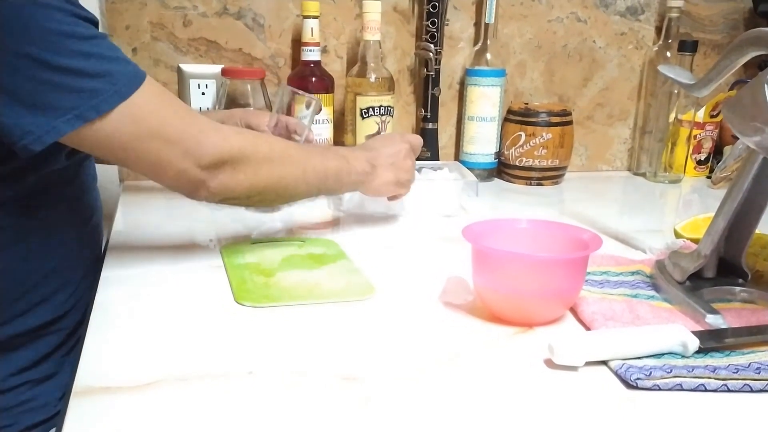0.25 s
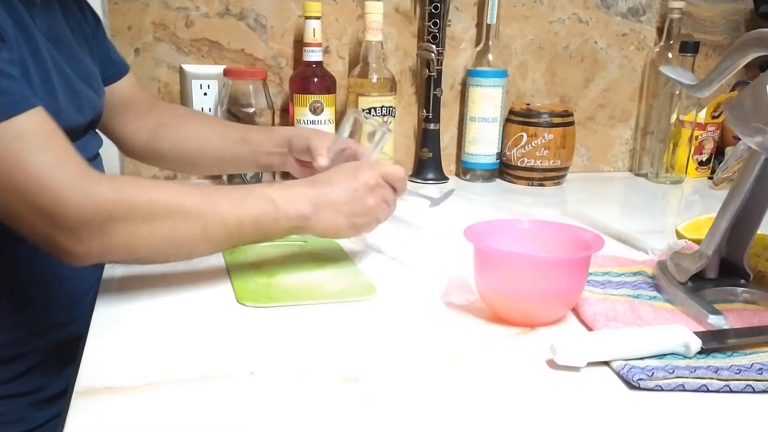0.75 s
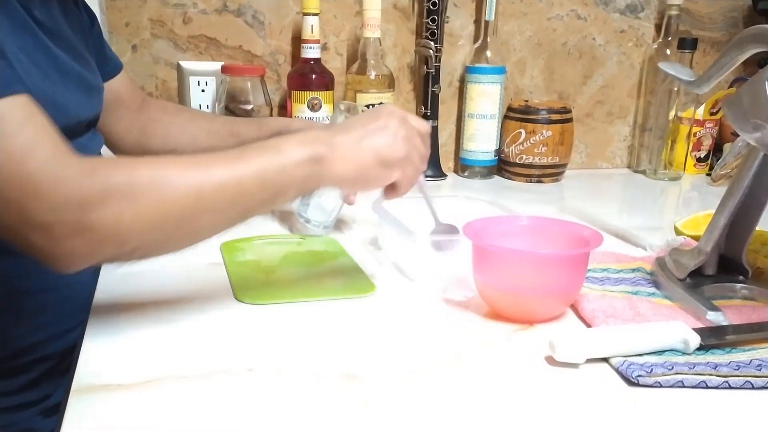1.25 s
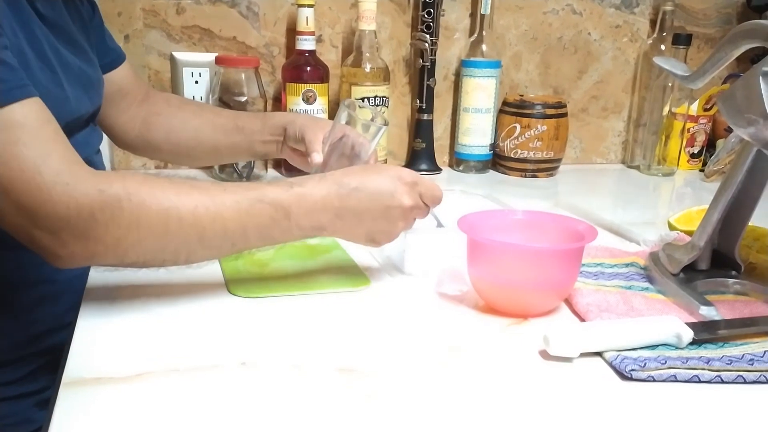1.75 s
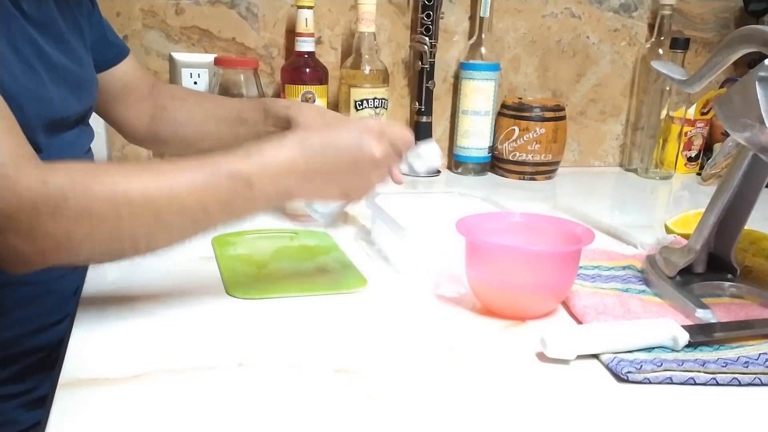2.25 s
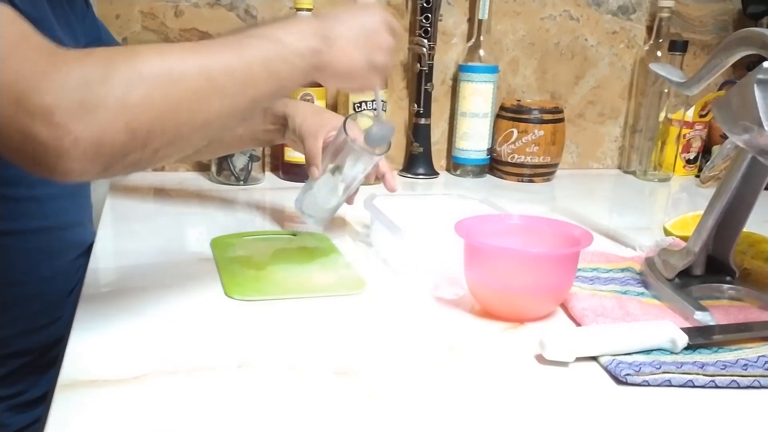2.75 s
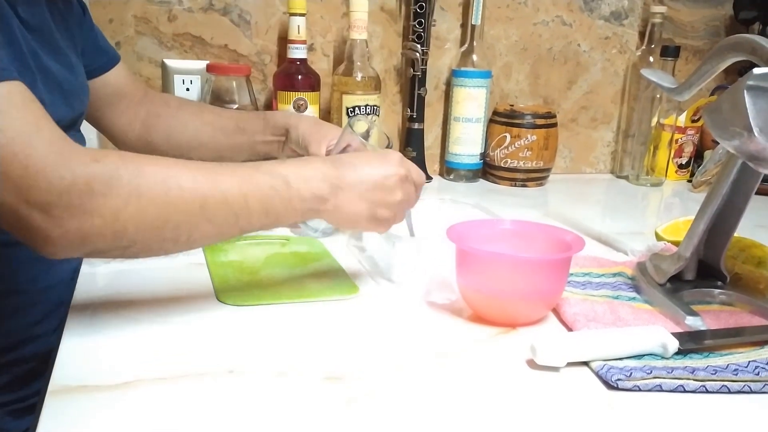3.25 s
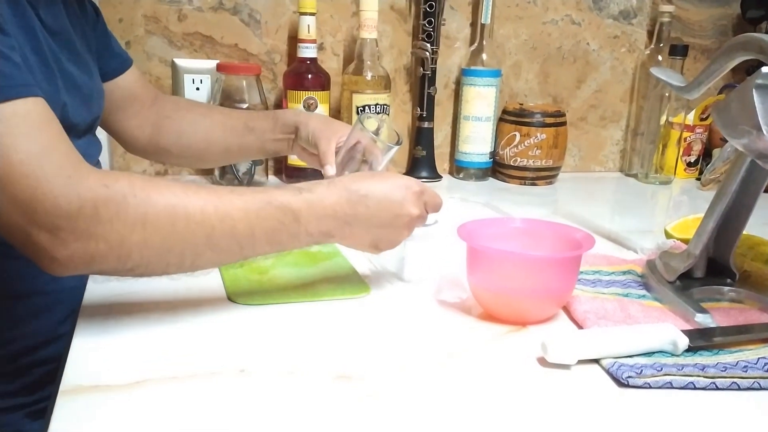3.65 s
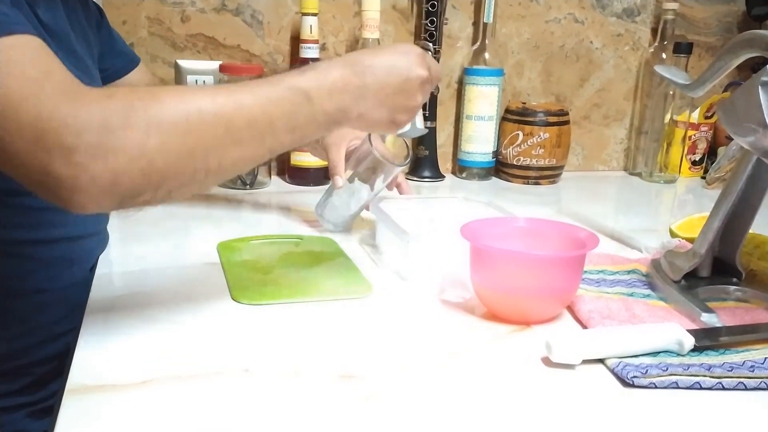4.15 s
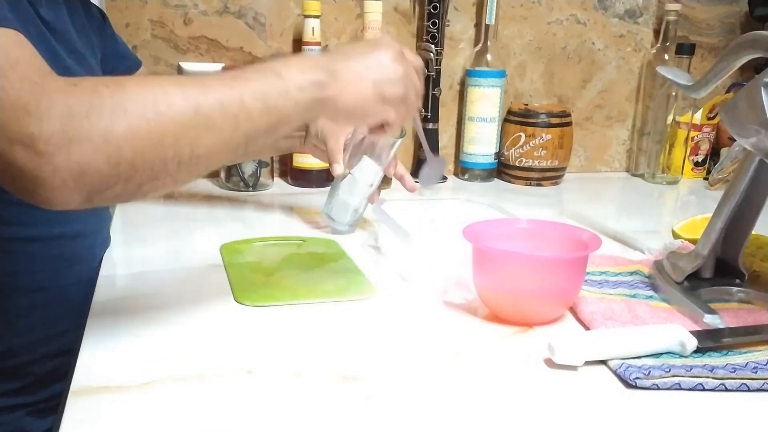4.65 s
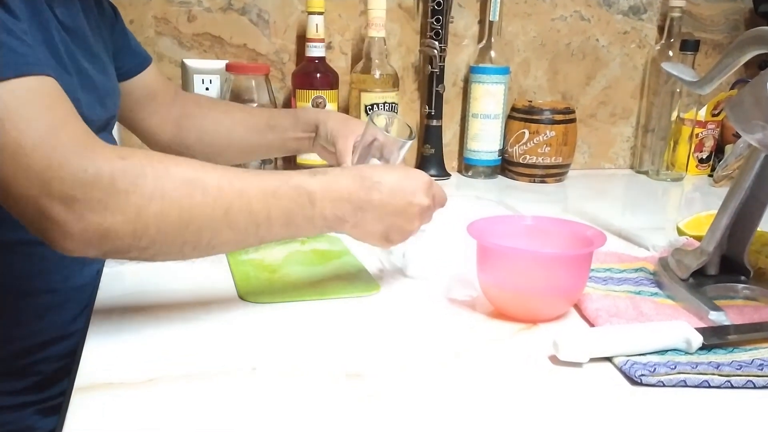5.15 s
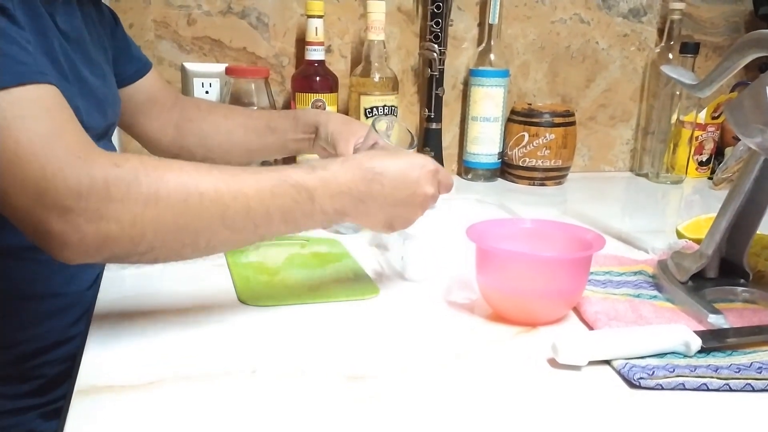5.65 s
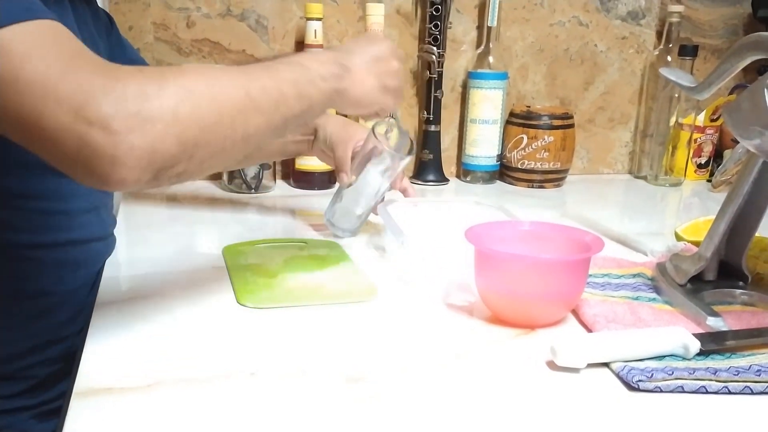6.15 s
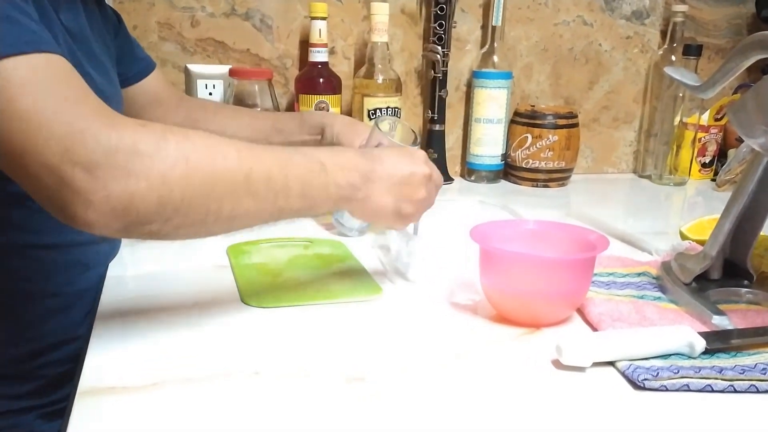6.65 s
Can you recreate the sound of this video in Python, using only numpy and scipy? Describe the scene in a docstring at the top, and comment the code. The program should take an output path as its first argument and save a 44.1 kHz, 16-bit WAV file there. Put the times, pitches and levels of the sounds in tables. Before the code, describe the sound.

A metal spoon digs through ice cubes in a plastic tub, gritty and crunching, then cubes clink brightly into a tall glass, three times over.

```python
"""A low hush of the house runs throughout. Ice grinds and knocks in a plastic tub as a metal spoon digs into it:
bursts of noisy slips and gritty collisions, answered by the resonances of the tub, which also shifts softly.
Then the cubes clink down a tall glass, cracking and waking decaying modes of its wall and the air inside.
Digging and clinking alternate, three spoonfuls in all, with thin pings of the spoon; the digging goes on at the end.
A hard-walled kitchen rings around it in stereo echo patterns, and a near stereo microphone rounds off peaks."""
import sys
import numpy as np
from scipy import signal
from scipy.fft import rfft, irfft
from scipy.io import wavfile
from scipy.ndimage import uniform_filter1d

SR = 44100
rng = np.random.default_rng(int(sys.argv[2]) if len(sys.argv) > 2 else 0)


def transcribe(signal):
    """Save signal, clipped to [-1, 1], as a 16-bit WAV file at the path in sys.argv[1]."""
    frames = np.atleast_2d(signal).T
    limited = np.clip(frames, -1, 1)
    pcm = np.round(limited * 32767).astype(np.int16)
    wavfile.write(sys.argv[1], SR, pcm)


N = 304290


def from_db(db):
    """Decibels to gain."""
    return 10 ** (np.asarray(db) / 20)


def unit_energy(x):
    """Scale so that the squares of each channel sum to one."""
    return x / np.sqrt(np.sum(x ** 2, axis=-1, keepdims=True) + 1e-20)


def at_hz(points, hz):
    """Read a table on a log-frequency axis."""
    freqs, values = np.transpose(points)
    return np.interp(np.log(np.maximum(hz, 1)), np.log(freqs), values)


def seconds(length):
    """A time axis."""
    return np.arange(int(length * SR)) / SR


def add(track, s, sound):
    """Mix a sound into a track at time s."""
    start = max(int(s * SR), 0)
    part = sound[:max(N - start, 0)]
    track[start:start + len(part)] += part


def colour(x, spectrum, size=4096):
    """Causal (minimum-phase) filter with the given spectrum."""
    bins_hz = np.arange(size // 2 + 1) * SR / size
    cepstrum = irfft(np.log(from_db(at_hz(spectrum, bins_hz))))
    # fold the cepstrum forward in time: this makes the phase minimal
    cepstrum[1:size // 2] *= 2
    cepstrum[size // 2 + 1:] = 0
    response = irfft(np.exp(rfft(cepstrum)))
    return signal.oaconvolve(x, response)[:len(x)]


def resonate(x, hz, width_hz):
    """A resonance with gain one at its top."""
    r = np.exp(-np.pi * width_hz / SR)
    zeros = np.array([1, 0, -1]) * (1 - r * r) / 2
    poles = [1, -2 * r * np.cos(2 * np.pi * hz / SR), r * r]
    return signal.lfilter(zeros, poles, x + 1e-18)


def resonate_twice(x, hz, width_hz):
    """A resonance with steep skirts that swells before it dies."""
    return resonate(resonate(x, hz, width_hz), hz, width_hz)


def chatter(t60, rise_s, grit_db):
    """One collision of rough faces: a dying volley of tiny uneven contacts."""
    t = np.arange(4096) / SR
    signs, sizes = rng.standard_normal((2, len(t)))
    swell = 1 - np.exp(-t / max(rise_s, 1e-5))
    return unit_energy(signs * swell * from_db(grit_db * sizes - 60 * t / t60))


def crumble():
    """A knock among loose cubes: the collision itself, then its neighbours settling."""
    collision = chatter(t60=0.028, rise_s=0.0012, grit_db=2.0)
    settling = chatter(t60=.13, rise_s=0.0055, grit_db=3.5)
    return collision + from_db(-6.0) * settling


def struck(modes, strength_db):
    """Ring of one blow; where it lands and what presses on the body shift each mode's share and pitch a little."""
    hz, level_db, t60 = np.transpose(modes)
    t = seconds(.6)
    share, load = rng.standard_normal((2, len(hz)))
    hz = hz * (1 + .002 * load)
    gains = from_db(level_db + strength_db + 2 * share) * rng.choice([-1, 1], len(hz))
    decays = np.exp(-np.log(1000) * t / t60[:, None])
    return gains @ (decays * np.sin(2 * np.pi * hz[:, None] * t))


def favour(modes, hz, db_per_octave):
    """A contact feeds the modes near its own pitch best: dB for each mode, flat beyond half an octave."""
    octaves_off = np.abs(np.log2(np.array(modes)[:, 0] / hz))
    return -db_per_octave * np.minimum(octaves_off, .5)


def grinding(per_s, spread_db, slip_t60, evenness_s):
    """Cubes slip past each other in random jerks, each a short rasp; rms about one."""
    sizes_db = spread_db * np.minimum(rng.exponential(1, N), 4)
    jerks = (rng.random(N) < per_s / SR) * from_db(sizes_db)
    power = signal.lfilter([1], [1, -from_db(-120 / (slip_t60 * SR))], jerks ** 2 + 1e-9)
    local_mean = uniform_filter1d(power, int(evenness_s * SR)) + 1e-9
    return rng.standard_normal(N) * np.sqrt(power / local_mean)


def force(strokes, attack_s, release_s, sag_db_per_s=0):
    """Gain over time for each level column: every stroke rises, sags while it lasts and lets go."""
    gains = np.zeros((len(strokes[0]) - 2, N))
    for start, length, *levels_db in strokes:
        t = seconds(length + release_s)
        rise = np.minimum(t / attack_s, 1)
        release = np.clip(1 - (t - length) / release_s, 0, 1)
        shape = rise * release * from_db(-sag_db_per_s * t)
        for gain, level_db in zip(gains, levels_db):
            add(gain, start, from_db(level_db) * shape)
    return gains


def hush(side_db):
    """Steady low background of the house: coloured noise, its side part weaker than its middle."""
    # Colour of the quiet room. Each row: frequency in Hz, relative level in dB.
    hush_colour = [(15, -43.5), (25, -10.5), (115, -7.5), (186, -16.5), (224, -6.5), (250, -24),
                   (344, -12.5), (383, -19), (588, -27.5), (15000, -40)]
    level_db = -55.5  # rms of the middle part
    mid, side = (np.sqrt(N) * unit_energy(colour(rng.standard_normal(N), hush_colour)) for _ in range(2))
    return from_db(level_db) * (mid + from_db(side_db) * side * [[1], [-1]])


def tub(crunch_db, rasp_db, grind_wall_db, knock_crunch_db, knock_db, knock_wall_db, split_hz):
    """Cubes crunch low and rasp high as they grind and knock; the plastic walls answer."""
    # Pushes of the spoon through the cubes, before the trims passed in.
    # Each row: start in seconds, length in seconds, crunch level in dB, rasp level in dB.
    pushes = [(0.28, 0.16, -33, -25.5), (0.43, 0.049, -18, -26.5), (0.51, 0.14, -37, -28.5),
              (0.68, 0.088, -23, -23.5), (0.755, .16, -19.5, -14.5), (1.255, 0.3, -21, -18.5),
              (1.435, 0.18, -16, -11), (1.65, 0.18, -26, -27.5), (1.855, 0.039, -27, -15.5),
              (3.24, 0.21, -14, -7), (3.44, 0.21, -24.5, -19), (3.69, 0.23, -38.5, -28.5),
              (4.06, 0.081, -29, -21), (4.96, 0.098, -12.5, -10.5), (5.07, 0.2, -22.5, -24),
              (5.295, 0.2, -23.5, -26), (5.53, .11, -37, -42), (5.722, 0.082, -16.5, -28.5),
              (6.615, 0.14, -18, -25), (6.745, 0.11, -17.5, -19.5)]
    # Cubes and spoon knocking, before the trims passed in. Each row: time in seconds, level in dB,
    # then crunch and tub wall, both in dB relative to that level.
    knocks = [(0.2712, -29.5, -0.5, -28), (0.2899, -15.5, 0.5, -16), (0.4728, -21.5, -1.5, -7),
              (0.651, -19, 3, -9.5), (0.773, -20.5, 9.5, -21), (0.8614, -11, 0.5, -31),
              (0.8893, -10, -3, -13), (1.1186, -16.5, -10.5, -12), (1.1875, 4, -9, -17),
              (1.2836, -12.5, 3, -5.5), (1.3541, -16.5, 1.5, 1), (1.4228, -7, -11, -8),
              (1.4569, -3, -7, -8), (1.5198, -18.5, -14, 2.5), (1.6222, -11, -1.5, -18),
              (1.8567, -20, -5, -8.5), (1.8885, -8, -7, -13.5), (3.1634, -6.5, -9.5, -10),
              (3.2655, -6, -4, -7), (3.2944, 2, -24, -9.5), (3.4222, -8.5, -18, -9),
              (3.6155, -10.5, -3, -6.5), (3.6549, -14, -7, -12), (3.6847, -7, -3, -25),
              (3.7728, -15.5, -32, -19), (3.8595, -6.5, -7, -10), (4.0516, -20, -24, -16),
              (4.0721, -15.5, -6, -14), (4.1496, -25, 6.5, -14), (4.8855, -13, -8, -11),
              (4.9082, -6.5, 0, -13), (5.0364, -23, -3, 6.5), (5.0515, -20, 3.5, -2.5),
              (5.3002, -14, -10, -15), (5.5196, -24.5, 1.5, -3.5), (5.8479, -10, -5, -14),
              (6.0813, -16.5, 0, -10), (6.5913, -7.5, -0.5, -10), (6.6029, -12, -7, -20),
              (6.858, -13.5, -12, -27)]
    # Resonances of the tub. Each row: frequency in Hz, width of each of two passes in Hz, level in dB.
    tub_modes = [(352.5, 190, -25), (677, 148, -7.5), (899.8, 162, -2), (934.4, 140, 4), (1041, 112, -3.5),
                 (1549, 110, -6)]
    # Colour of ice on ice. Each row: frequency in Hz, relative level in dB.
    ice_colour = [(40, -32.5), (150, -20), (400, -13), (700, -1.5), (1200, 0), (1800, 3.5), (2300, 0),
                  (3000, -3.5), (5200, -2), (7500, -6), (10500, -8.5), (13000, -14.5), (16000, -17.5)]

    # every push takes hold, sags as the cubes give way, and lets go
    crunch_push, rasp_push = force(pushes, attack_s=0.022, release_s=0.024, sag_db_per_s=39)
    # coarse slips crunch, fine ones rasp
    crunch = crunch_push * grinding(per_s=150, spread_db=5, slip_t60=.008, evenness_s=.04)
    rasp = rasp_push * grinding(per_s=300, spread_db=1.5, slip_t60=0.01, evenness_s=.03)
    wall = from_db(grind_wall_db) * crunch
    crunch = from_db(crunch_db) * crunch
    rasp = from_db(rasp_db) * rasp
    for s, level_db, body_db, wall_db in knocks:
        add(rasp, s, from_db(level_db + knock_db) * crumble())
        add(crunch, s, from_db(level_db + body_db + knock_crunch_db) * crumble())
        add(wall, s, from_db([level_db + wall_db + knock_wall_db]))  # one clean push

    low, high = (signal.butter(2, split_hz, kind, fs=SR, output="sos") for kind in ("low", "high"))
    out = colour(signal.sosfilt(low, crunch) - signal.sosfilt(high, rasp), ice_colour)
    for k, (hz, width_hz, level_db) in enumerate(tub_modes):
        out += (-1) ** k * from_db(level_db) * resonate_twice(wall, hz, width_hz)
    return out


def shifting(width_hz):
    """The tub judders softly on the counter: narrow bands of noise that swell and fade."""
    # Each row: start in seconds, end in seconds, pitch in Hz, level in dB at the top of the swell.
    shifts = [(0.832, 1.10, 151, -45.5), (0.997, 1.30, 129, -53), (1.992, 2.366, 385, -51.5)]
    out, t = np.zeros(N), np.arange(N) / SR
    for start, end, hz, level_db in shifts:
        judder = np.sqrt(N) * unit_energy(resonate_twice(rng.standard_normal(N), hz, width_hz))
        swell = np.sin(np.pi * np.clip((t - start) / (end - start), 0, 1))
        out += from_db(level_db) * judder * swell
    return out


def glass(crack_db, cube_db, cube_width_hz, air_db, slide_db):
    """Each contact cracks, rings the cube briefly, and wakes the glass wall and the air inside it."""
    # Cubes sliding down inside the glass, one row per spoonful, before slide_db.
    # Each row: start in seconds, length in seconds, level in dB.
    slides = [(2.755, 0.15, -42.5), (4.415, .115, -35.5), (6.19, 0.193, -32.5)]
    # Ice and spoon striking the glass, before the trims. Each row: time in seconds, level in dB,
    # weight behind the blow in dB, pitch of the contact in Hz, pitch of the air column in Hz.
    clinks = [(2.606, -39, 15, 7550, 650), (2.659, -24, -12.5, 7500, 570), (2.6992, -21, -3, 7800, 592),
              (2.7433, -20.5, -10, 6270, 718), (2.7685, -17.5, -2.5, 3200, 676),
              (2.7912, -11, 4.5, 5550, 645), (2.8374, -15.5, -1, 5800, 684), (2.8487, -17, -2, 6000, 622),
              (2.889, -9.5, 4, 5860, 677), (4.3464, -22.5, 3.5, 7750, 637), (4.386, -28.5, -18, 3200, 640),
              (4.4504, -10, 0.5, 5900, 661), (4.4609, -12.5, 1, 6150, 670), (4.4788, -17.5, -1, 5900, 637),
              (4.505, -15, -6, 5800, 706), (4.5255, -22, 2, 3180, 677), (6.1444, -29, 16.5, 3880, 643),
              (6.1744, -11, -10, 6100, 705), (6.2382, -20, -3, 6150, 635), (6.2514, -23, 11, 6200, 663),
              (6.3283, -7, 6, 5470, 735), (6.4765, -36.5, 30.5, 5440, 640)]
    # Modes of the glass wall, ringing free. Each row: frequency in Hz, level in dB, t60 in seconds.
    wall_modes = np.array([(1440, -2, 0.17), (1523, -7, 0.2), (3130, -2, 0.26), (3166, -6.5, 0.43),
                           (3720, -17, 0.22), (4540, -12, .25), (5400, -21, .25), (5351, -31, .25),
                           (5940, -2, 0.13), (5990, -2, 0.19), (5900, -26, 0.21), (7720, -2.5, 0.18),
                           (8770, -7.5, 0.45), (8920, -8.5, 0.29), (11040, -2.5, 0.15), (11630, -2.5, 0.11),
                           (13770, -4, 0.083), (15150, -8, 0.086)])
    # By the last spoonful the fuller glass rings softer and shorter, and ice meeting ice sounds brighter.
    # Each row: time in seconds, ring level in dB, treble level in dB, share of the free ring time (a ratio).
    fill_s, *filling = np.transpose([(2.7, -7.5, -0.5, .95), (4.4, -8, -0.5, 0.98), (6.3, -12, 7, 0.66)])
    # Colour of ice on glass. Each row: frequency in Hz, relative level in dB.
    crack_colour = [(40, -38), (200, -29), (600, -6), (1500, 1), (2400, -4.5), (3500, -1), (5000, 0.5),
                    (6200, 0.5), (7300, -2.5), (10500, -6), (13000, -14), (16000, -16)]

    sliding = force(slides, attack_s=0.037, release_s=0.011)[0]
    slips = grinding(per_s=150, spread_db=7, slip_t60=.006, evenness_s=.035)
    cracks = from_db(slide_db) * sliding * slips
    rings = np.zeros(N)
    for s, level_db, weight_db, contact_hz, column_hz in clinks:
        ring_db, bright_db, freedom = (np.interp(s, fill_s, column) for column in filling)
        # a heavy blow wakes the low modes and the air column; a light one on a small hard edge the treble
        bass_db = -9 + 0.87 * weight_db
        treble_db = bright_db + 7 * np.log2(contact_hz / 6000) - 0.23 * weight_db
        contact = [(1400, level_db + bass_db), (3000, level_db), (6200, level_db), (8000, level_db + treble_db)]
        crack = from_db(crack_db) * chatter(t60=0.017, rise_s=0.00018, grit_db=4.0)
        cube = from_db(level_db + cube_db) * resonate(crack, contact_hz, cube_width_hz)
        add(cracks, s, colour(crack, contact) + cube)
        strength_db = at_hz(contact, wall_modes[:, 0]) + favour(wall_modes, contact_hz, db_per_octave=23) + ring_db
        add(rings, s, struck(wall_modes * [1, 1, freedom], strength_db))
        air_column = [(column_hz, 0, 0.11)]  # Hz, dB, t60 in seconds
        add(rings, s, struck(air_column, level_db + weight_db + air_db))
    return colour(cracks, crack_colour) + rings


def spoon(tick_db):
    """Thin high pings as the spoon flicks off a cube, each with a gritty tick."""
    # The spoon ringing free. Each row: time in seconds, level in dB, pitch favoured by the flick in Hz.
    pings = [(3.300, -17, 11400), (3.330, -22, 14850), (5.130, -37, 8301), (5.752, -35, 11400),
             (5.925, -30, 8301)]
    # Modes of the spoon. Each row: frequency in Hz, level in dB, t60 in seconds.
    spoon_modes = [(8301, 0, .22), (11400, 0, .16), (14850, 0, .16)]
    out = np.zeros(N)
    for s, level_db, hz in pings:
        add(out, s, struck(spoon_modes, level_db + favour(spoon_modes, hz, db_per_octave=18)))
        add(out, s, from_db(level_db + tick_db) * resonate(crumble(), hz, width_hz=900))
    return out


def drift(rate, count):
    """Several slow random motions of spread one: noise through a lowpass with its corner near rate, in Hz."""
    control_hz = 1000
    r = np.exp(-2 * np.pi * rate / control_hz)
    slow = signal.lfilter([1], [1, -2 * r, r * r], rng.standard_normal((count, 9000)))
    slow = slow[:, 1000:]  # drop the filter's start-up
    t = np.arange(N) / SR * control_hz
    return np.array([np.interp(t, np.arange(len(s)), s / s.std()) for s in slow])


def reflections(near_db, near_t60, far_db, build_s):
    """Stereo echo pattern of one spot: quick returns from counter and wall, then the tail of the room."""
    # Ring of the kitchen. Each row: frequency in Hz, t60 in seconds.
    room_t60 = [(150, 1), (600, 0.8), (1400, 0.82), (3700, 0.73), (9000, 0.6), (15000, 0.36)]
    # Left-right likeness of the room sound. Each row: frequency in Hz, correlation from -1 to 1.
    likeness = [(100, 1), (700, 0.82), (1400, 0.073), (3000, 0.2), (8000, -0.073)]
    t, edges = seconds(.7), np.geomspace(60, 18000, 15)
    white, response = rng.standard_normal((2, 2, len(t))), np.zeros((2, len(t)))
    for k, (low, high) in enumerate(zip(edges, edges[1:])):
        hz = np.sqrt(low * high)
        near = from_db(near_db - 60 * t / near_t60) * (t > .0005)
        far = from_db(far_db - 60 * t / at_hz(room_t60, hz)) * (1 - np.exp(-t / build_s))
        band = signal.butter(2, [low, high], "band", fs=SR, output="sos")
        # neighbouring bands use different noise
        mid, side = signal.sosfilt(band, white[k % 2] * np.hypot(near, far))
        alike = np.clip(at_hz(likeness, hz), -1, 1)
        response += np.sqrt((1 + alike) / 2) * mid + np.sqrt((1 - alike) / 2) * side * [[1], [-1]]
    return response


def kitchen(x, direct_db, near_db, near_t60, far_db, count=7):
    """The source keeps moving, so its sound wanders between the echo patterns of a few spots."""
    shares = drift(9, count=count)
    shares /= np.linalg.norm(shares, axis=0)
    wet = np.zeros((2, N))
    for share in shares:
        echoes = reflections(near_db, near_t60, far_db, build_s=0.0013)
        wet += signal.oaconvolve((x * share)[None], echoes, axes=1)[:, :N]
    return from_db(direct_db) * x + wet


def scene():
    """Digging in the tub and ice dropping into the nearer glass, each in the kitchen, over the quiet house."""
    digging = tub(crunch_db=1.0, rasp_db=3.0, grind_wall_db=9.0, knock_crunch_db=29.0, knock_db=26,
                  knock_wall_db=45, split_hz=1840)
    digging = digging + spoon(tick_db=43)
    dropping = glass(crack_db=20, cube_db=5.0, cube_width_hz=470, air_db=-22, slide_db=5)
    digging = kitchen(digging, direct_db=-5.5, near_db=-25.5, near_t60=0.1, far_db=-35.0)
    dropping = kitchen(dropping, direct_db=-2, near_db=-23, near_t60=0.12, far_db=-35.0)
    return digging + dropping + shifting(width_hz=84) + hush(side_db=-10.0)


def record(dry):
    """The two ports differ in tone, the left hearing more treble; peaks overload softly; the top is cut."""
    # Tilt between the microphone ports. Each row: frequency in Hz, left minus right in dB.
    balance = [(100, -0.5), (700, 1), (1300, -0.5), (2400, -0.5), (4400, 4), (8000, 9.5), (15000, 5.5)]
    left, right = ([(hz, side * db / 2) for hz, db in balance] for side in (1, -1))
    ports = np.array([colour(dry[0], left), colour(dry[1], right)])
    top_cut = signal.ellip(10, .1, 70, 15800, fs=SR, output="sos")  # ripple dB, stop dB, corner Hz
    return signal.sosfilt(top_cut, np.tanh(ports))


dry = scene()
out = record(dry)
transcribe(out)
```